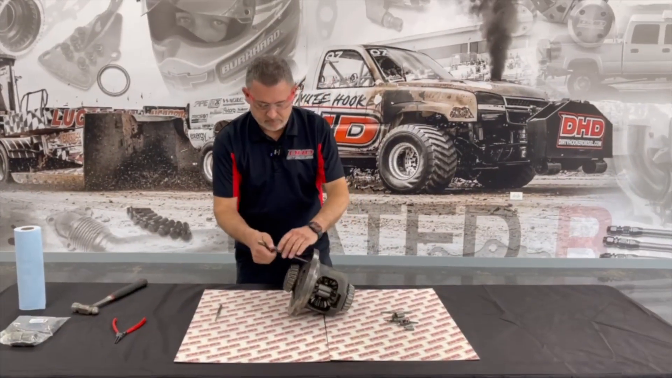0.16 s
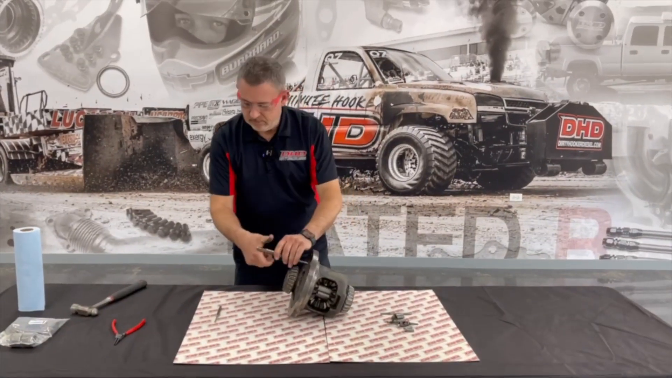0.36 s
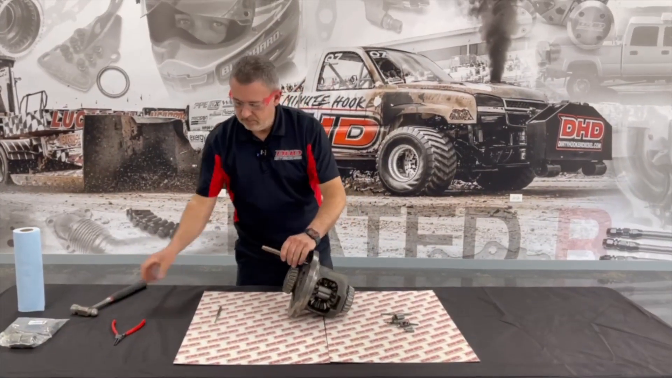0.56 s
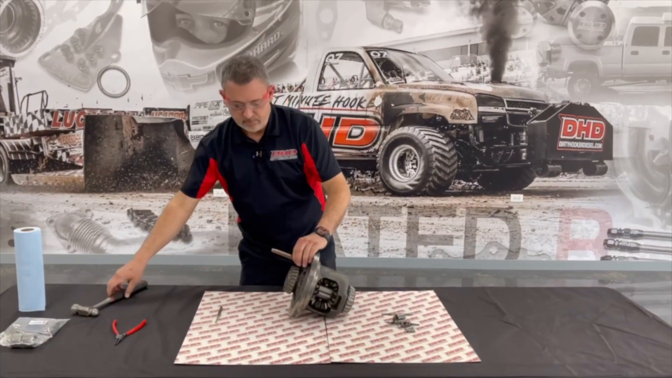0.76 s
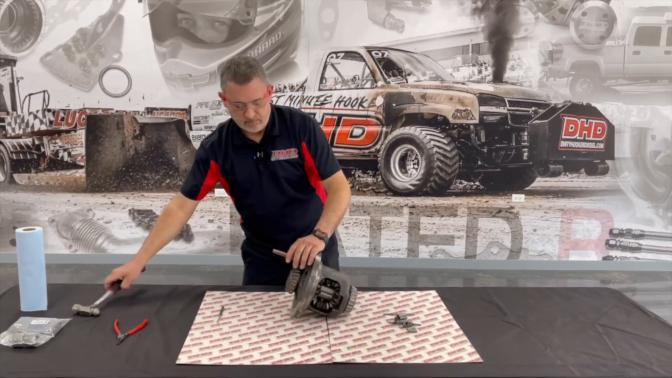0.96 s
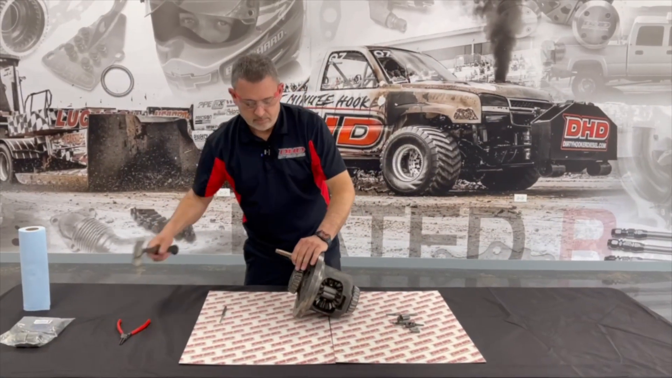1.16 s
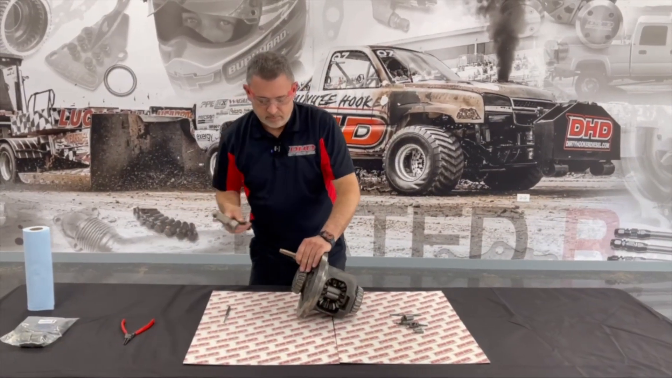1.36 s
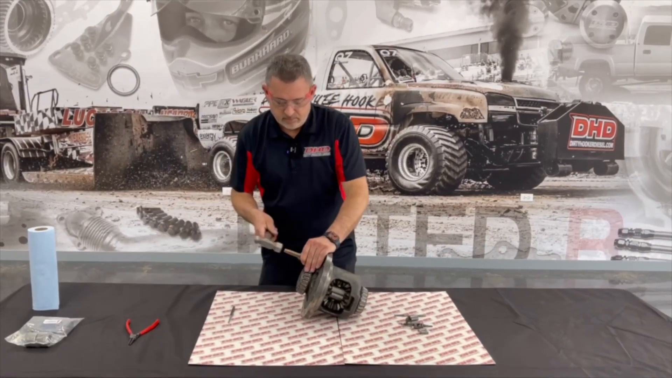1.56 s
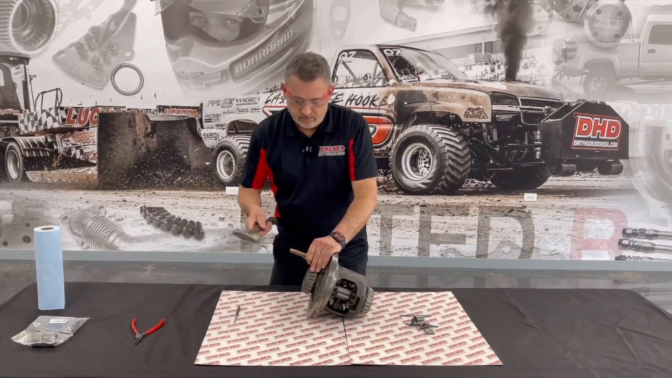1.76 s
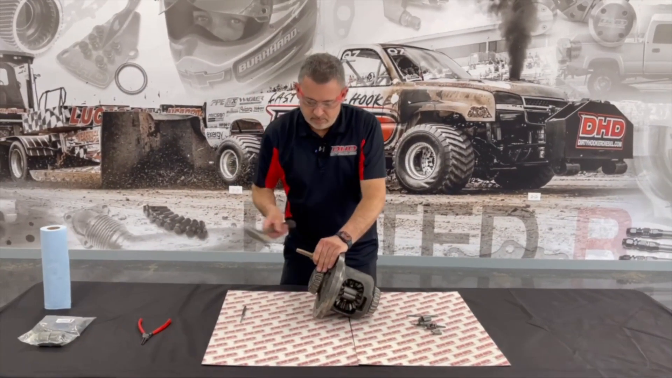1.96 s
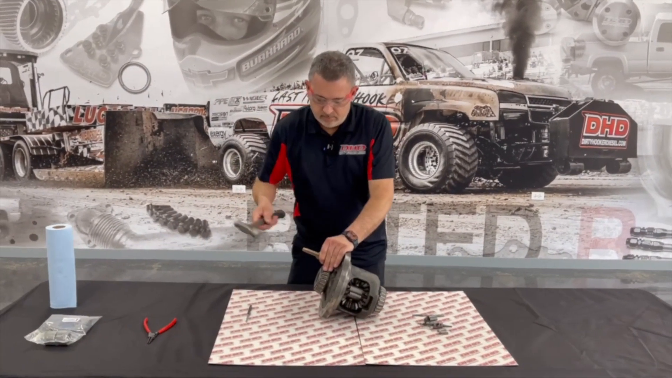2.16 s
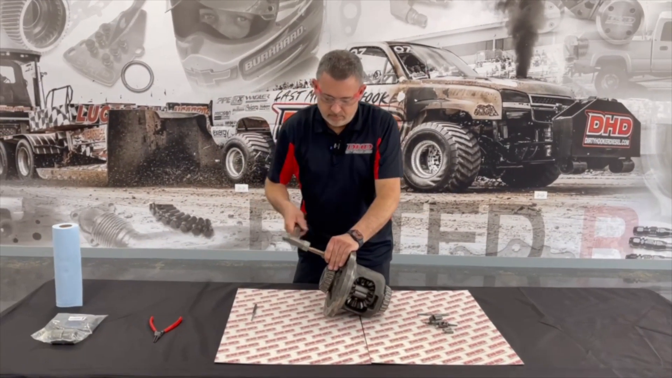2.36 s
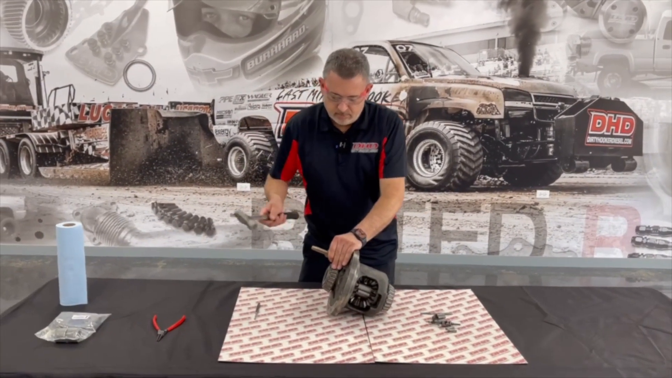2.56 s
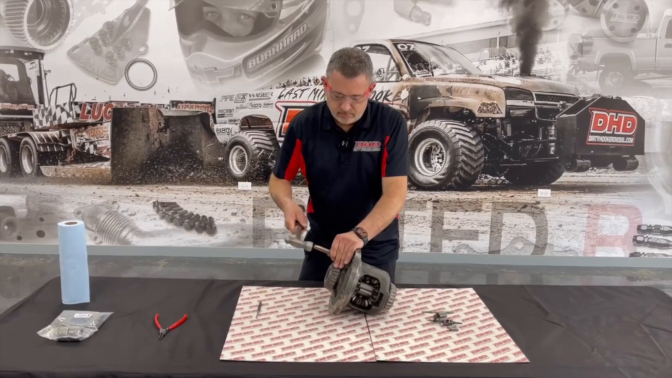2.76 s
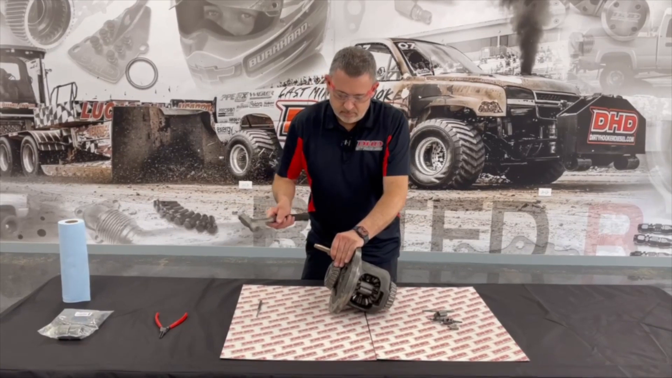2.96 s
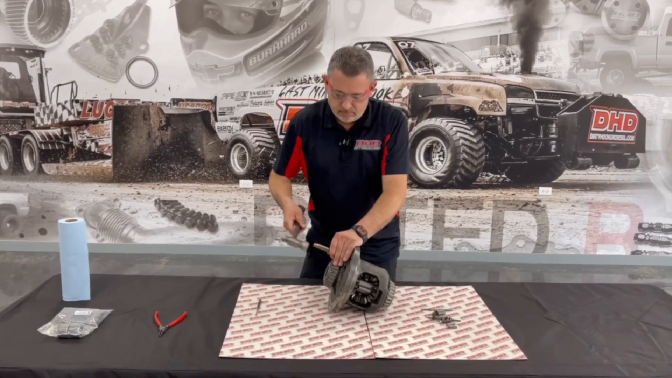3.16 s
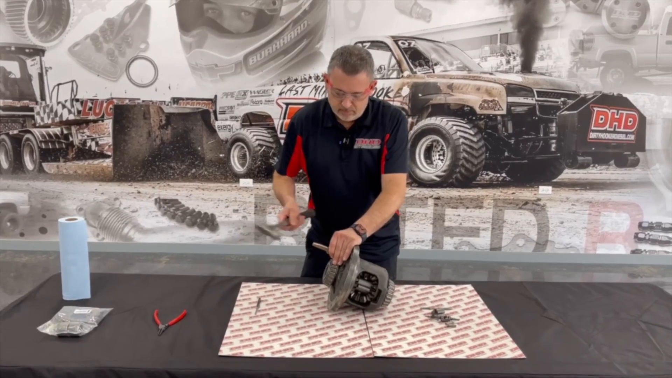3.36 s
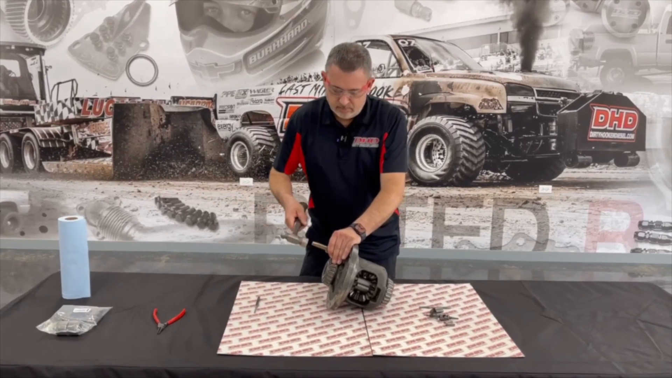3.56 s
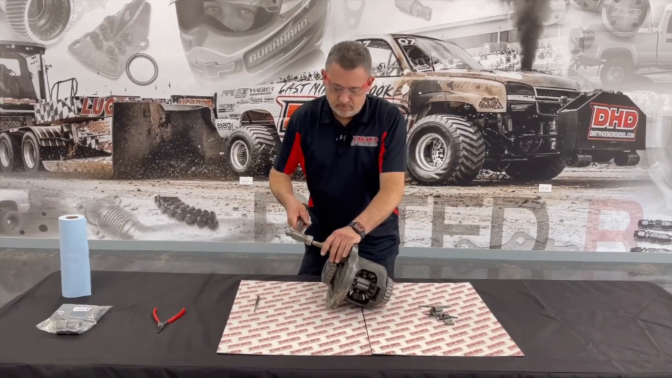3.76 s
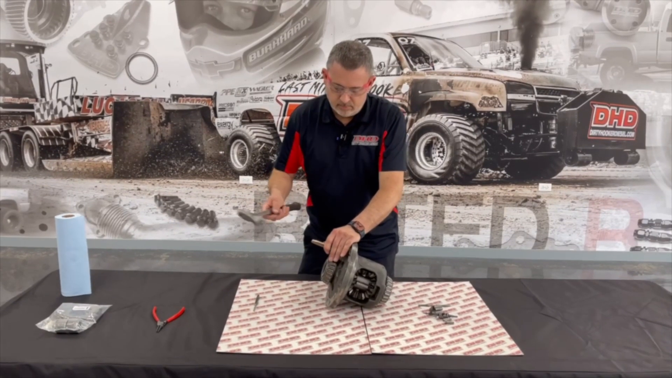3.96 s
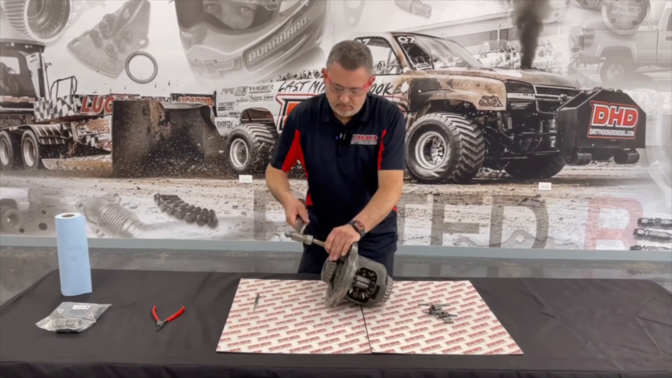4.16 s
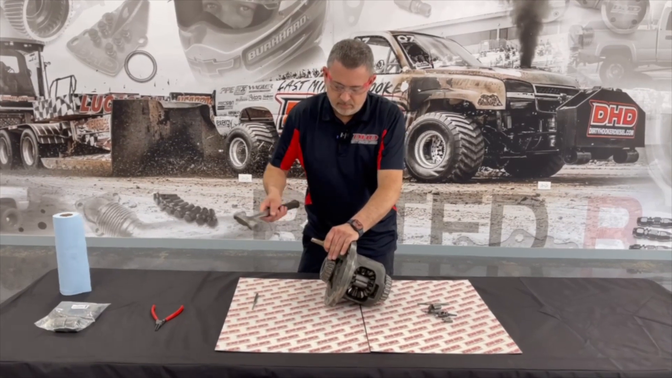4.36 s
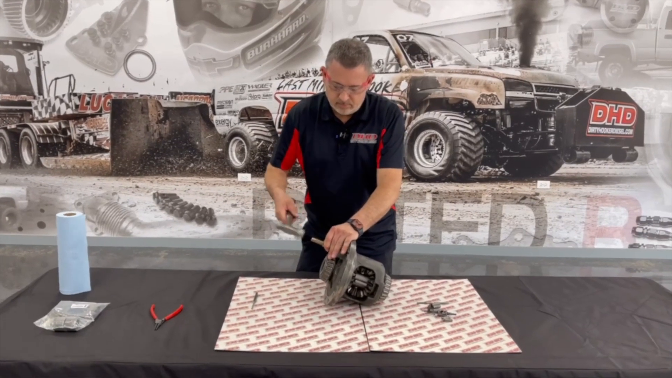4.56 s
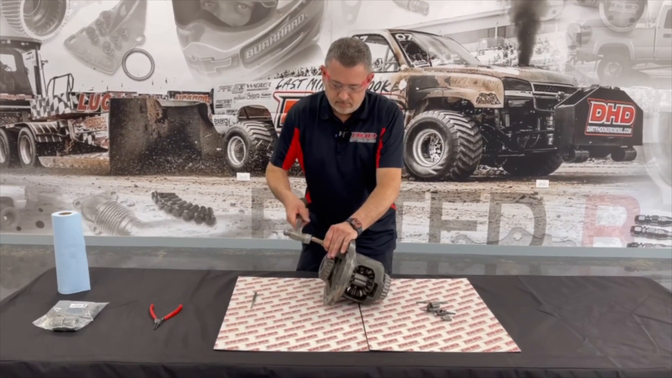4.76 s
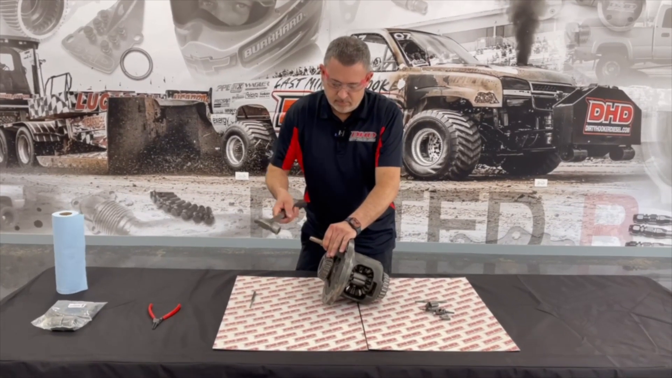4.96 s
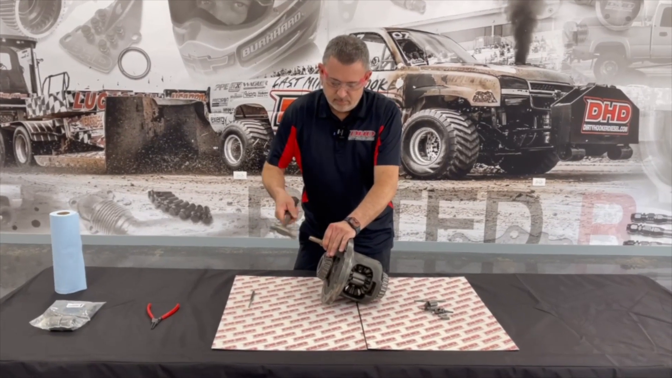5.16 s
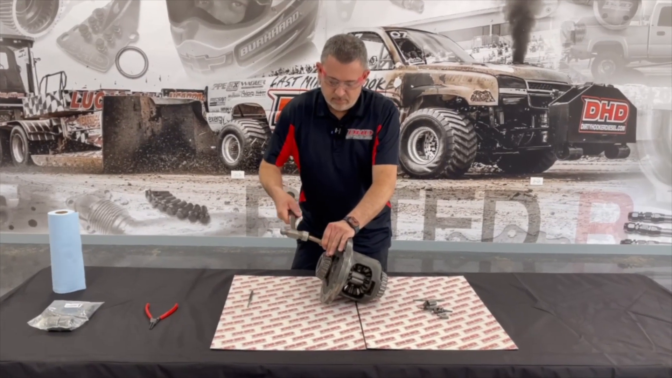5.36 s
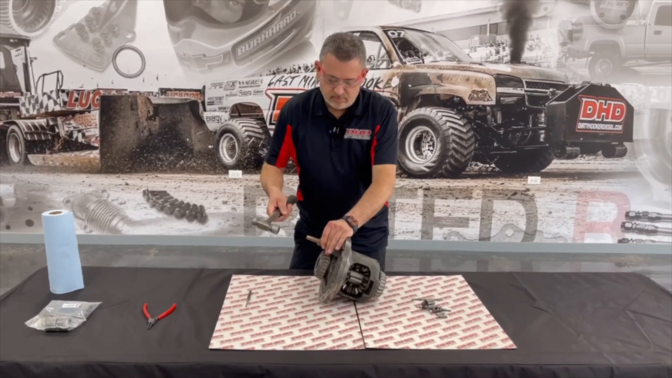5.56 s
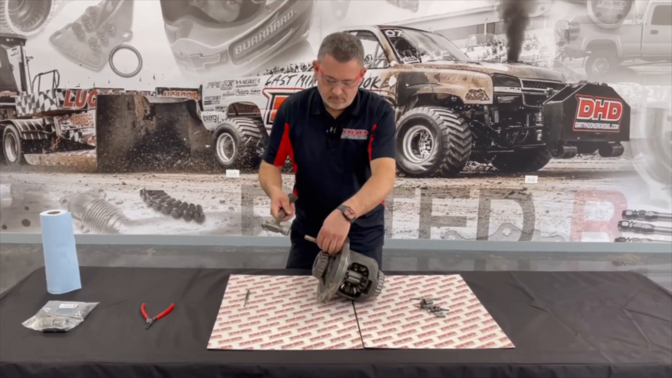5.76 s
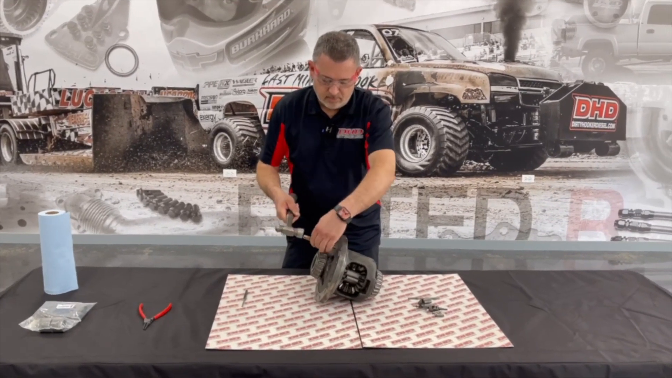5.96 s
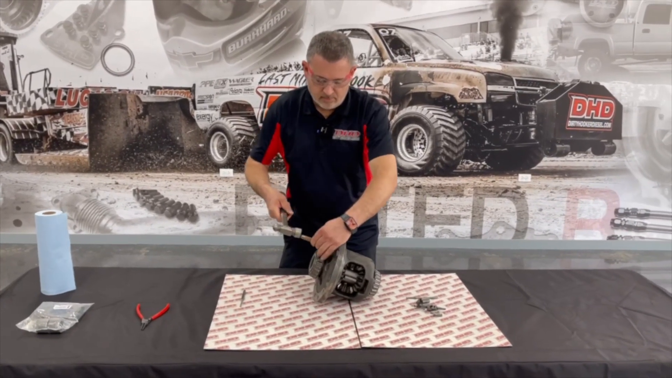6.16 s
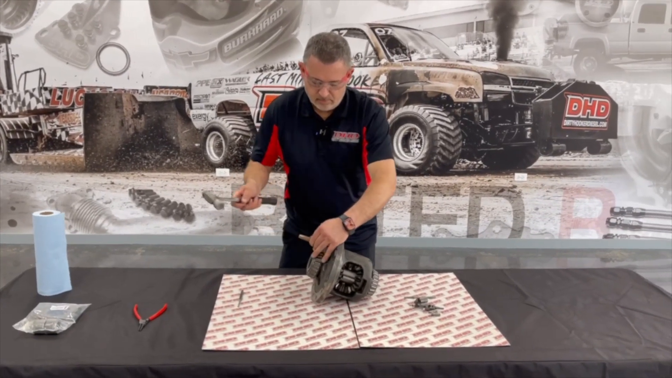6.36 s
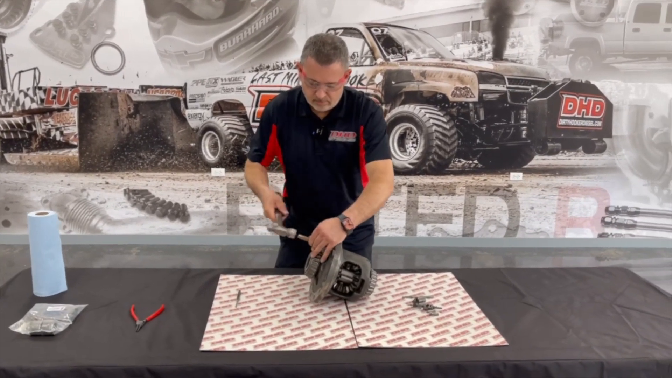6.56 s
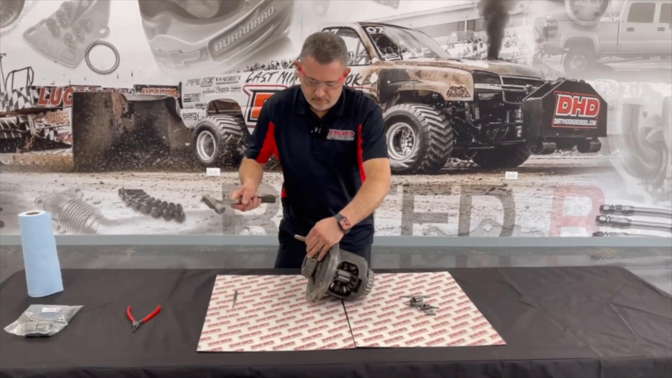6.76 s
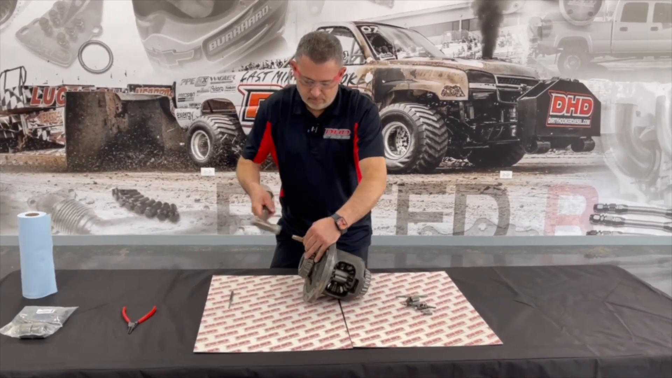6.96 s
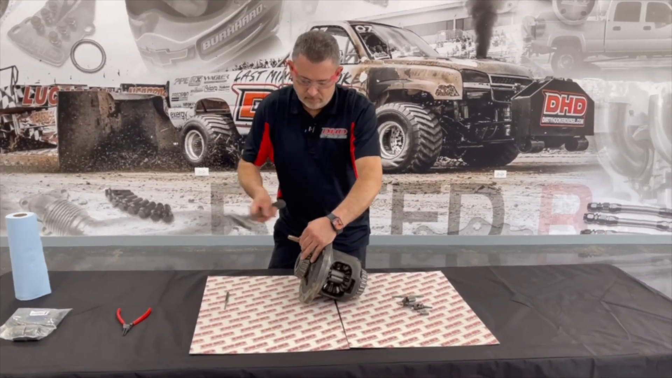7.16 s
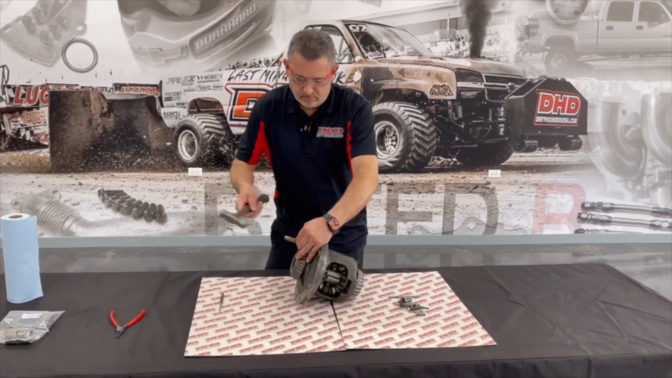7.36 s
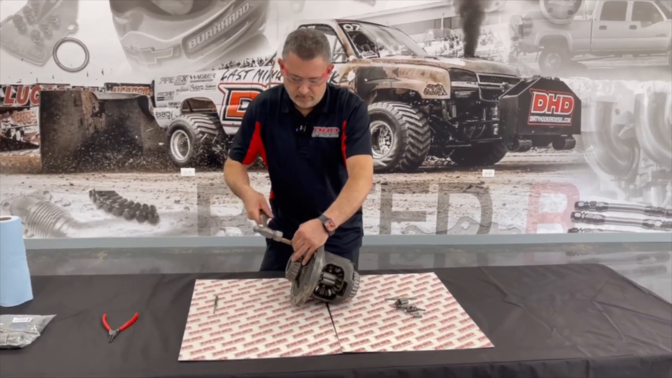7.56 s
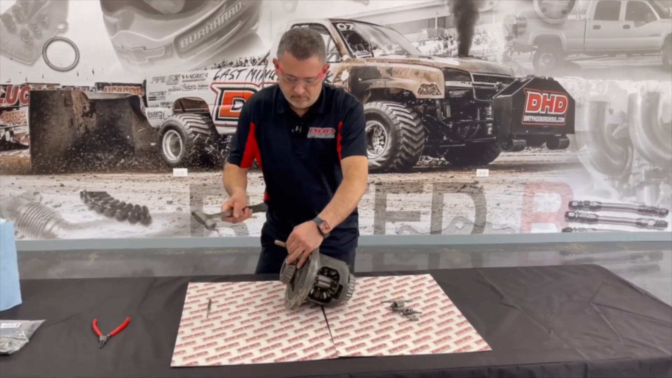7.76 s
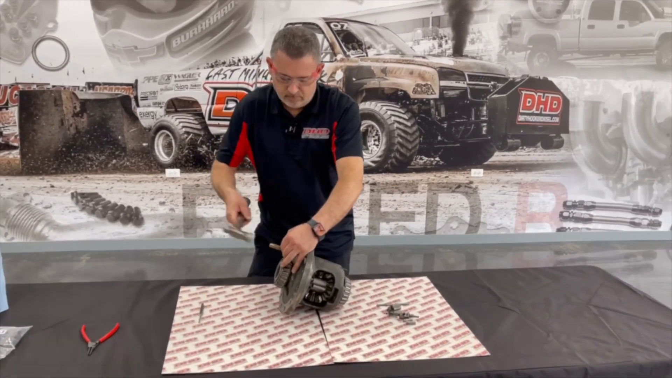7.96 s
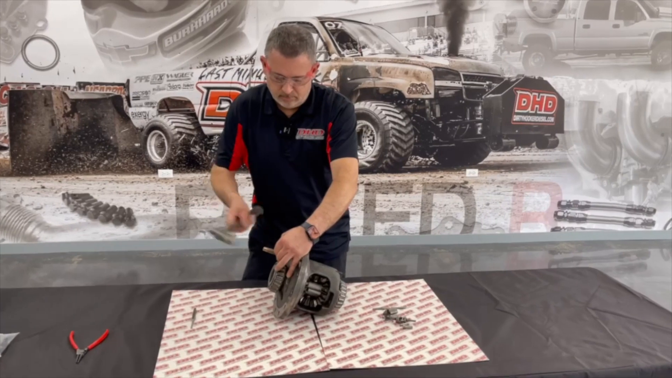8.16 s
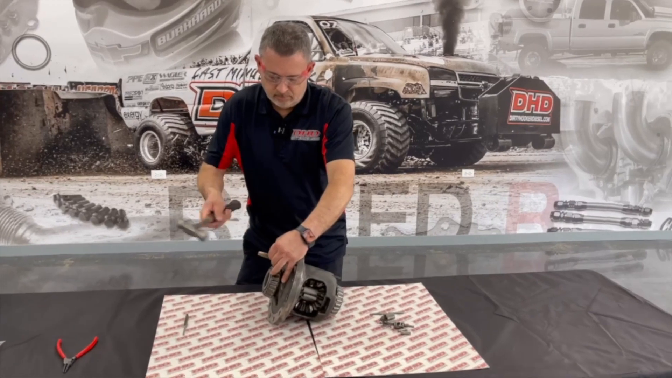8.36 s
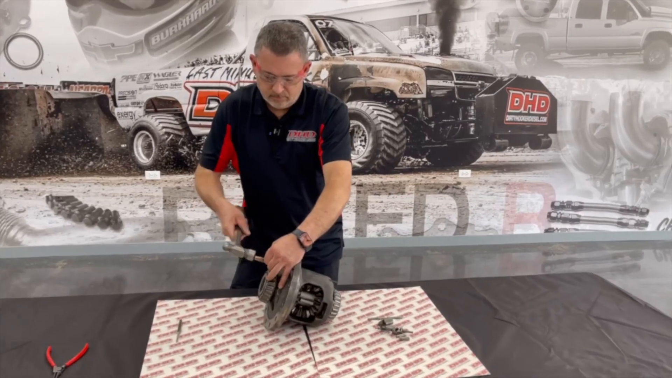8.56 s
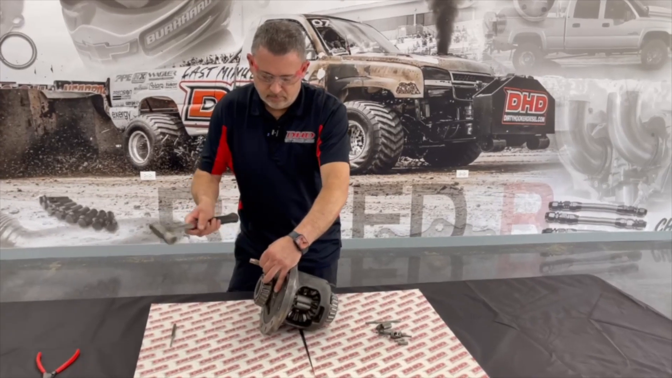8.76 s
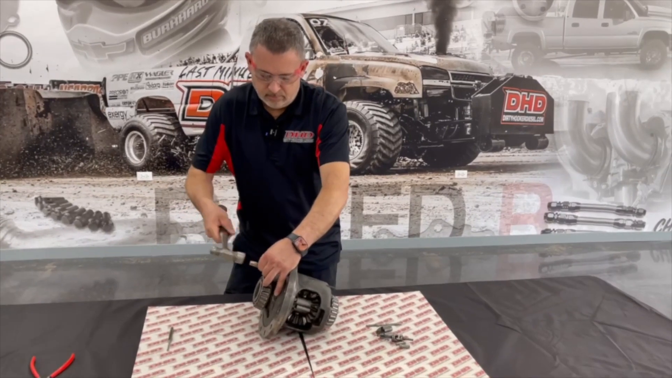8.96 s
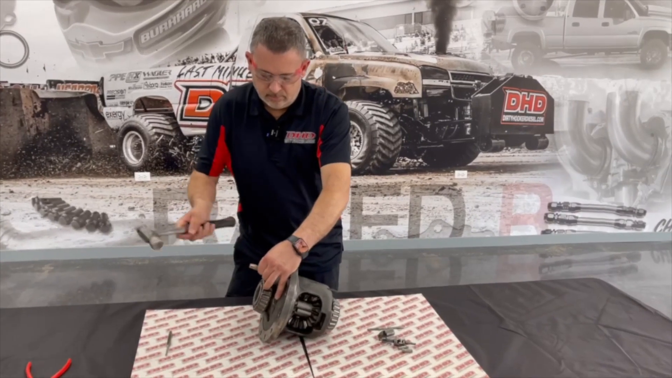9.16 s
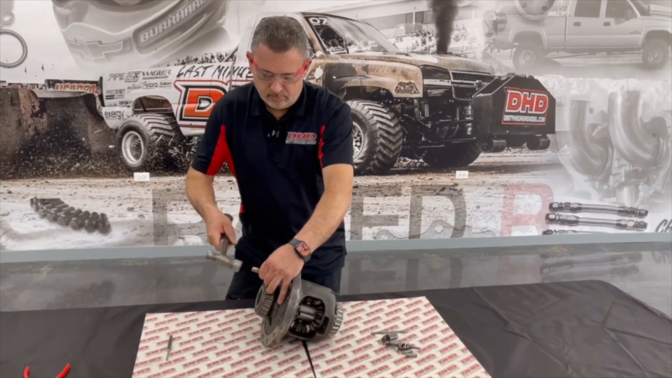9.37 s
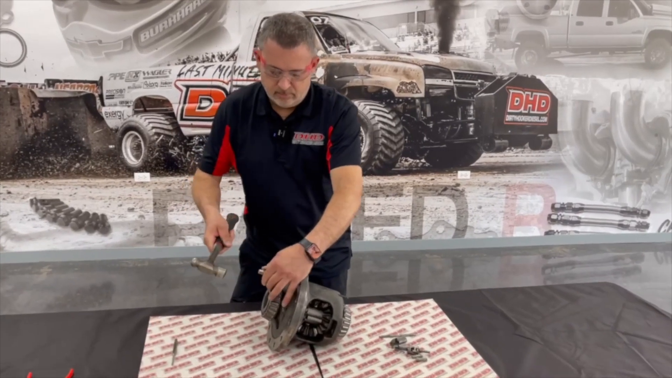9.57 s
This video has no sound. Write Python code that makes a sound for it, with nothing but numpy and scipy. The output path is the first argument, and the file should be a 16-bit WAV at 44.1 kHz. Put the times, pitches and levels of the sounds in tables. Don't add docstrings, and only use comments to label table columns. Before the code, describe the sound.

In a hard-walled workshop, a sleeve rustles faintly and a steel punch scrapes and clicks into its hole. A soft first hammer blow leads to sharp, bright cracks about three a second, each with a clank, short rattle and low bench thump. Two brief pauses hold a light tap or bouncing clicks before the runs resume. The microphone stands a few metres off, catching room echo and very quiet hum.

```python
import sys
import numpy as np
from scipy import signal
from scipy.fft import rfft, irfft
from scipy.io import wavfile
from scipy.ndimage import uniform_filter1d

SR = 44100
rng = np.random.default_rng(int(sys.argv[2]) if len(sys.argv) > 2 else 0)


def amp(db):
    return 10 ** (np.asarray(db, float) / 20)


def write(x):
    x = np.atleast_2d(x).T
    wavfile.write(sys.argv[1], SR, np.round(np.clip(x, -1, 1) * 32767).astype(np.int16))


N = 424706

# [f/Hz, level/dB]
HUM = [(15, -24.5), (25, -8), (127, -1), (309, -11), (439, -14), (796, -11.5), (1400, -25.5), (2350, -18.5),
       (3340, -26), (4370, -21.5), (7920, -28), (12500, -36.5), (16000, -53)]
HUM_DB = -71.5
# [t/s, level/dB]
HUSH = [(0, 1.5), (.15, -5.5), (.4, -1.5), (1.5, -7), (2.1, -3.5), (9.63, -8)]

# [t/s, level/dB]
RUSTLES = [
    (.272, -81),
    (1.029, -75),
    (1.268, -76.5),
    (1.378, -74),
    (1.482, -81.5),
]
# [f/Hz, level/dB]
CLOTH = [(1200, -29.5), (1900, -11.5), (2650, 6), (3300, -2), (5000, -5), (8000, -9), (12000, -25),
         (16000, -35)]
RUSTLE_IN_S, RUSTLE_IN_DB, RUSTLE_OUT_S, RUSTLE_OUT_DB = 0.048, -24.5, 0.039, -27

# [jam t/s, push length/s, level/dB, whistle from f/Hz, to f/Hz]
PUSHES = [
    (0.543, .05, -48, 2600, 3364),
    (0.623, .042, -48.5, 3607, 4200),
    (0.654, .012, -51.5, 3840, 3900),
    (0.703, .03, -34, 2900, 2720),
]
# [f/Hz, level/dB]
RUB = [(350, -72), (600, -38.5), (834, -28), (1880, -49), (3940, -16.5), (5260, -1), (6830, -3.5),
       (10600, -8), (16000, -40.5)]
PUSH_START_DB, PUSH_MIDDLE_DB = -26, -14.5
STOP_S, STOP_DB = .016, -23.5
WHISTLE_DB = (3, -2.5, -6.5)

# [t/s, level/dB, f/Hz, loose punch level/dB, bench level/dB]
TICKS = [(0.697, -38, 5530, -36.5, -61), (0.709, -38, 8600, -68, -56.5), (0.736, -56, 5400, -70, -70),
         (0.868, -44.5, 910, -86, -58), (0.903, -56.5, 5540, -87, -62), (1.027, -55, 940, -87, -47),
         (1.072, -51, 5560, -78.5, -59), (1.244, -55.5, 1110, -95.5, -65.5),
         (3.733, -41.5, 4560, -72.5, -67.5), (6.312, -55, 1930, -85, -74), (6.369, -58, 2700, -95, -66),
         (6.373, -54, 1090, -97.5, -64.5), (9.281, -7.5, 554, -96, -61)]
# [t/s, level/dB, loose punch level/dB, bench level/dB]
TAPS = [
    (3.654, -26.5, -43.5, -48.5),
    (5.996, -23.5, -55.5, -46),
    (6.036, -51, -68, -41.5),
    (6.049, -25.5, -58, -52),
    (6.068, -35, -67, -48),
    (6.083, -39.5, -79.5, -53),
    (6.091, -47.5, -70, -60),
]
# [f/Hz, level/dB, t60/s]
TAP = [(606, -2.5, 0.016), (1780, -32.5, .03), (2900, -7, 0.031), (4200, 13.5, 0.0048), (6900, -0.5, 0.011),
       (10240, -2, 0.0082), (13560, -5.5, 0.016)]
# [f/Hz, level/dB, t60/s]
PUNCH = [(2700, -19.5, .02), (5530, -7, 0.03), (8000, -4, 0.049), (12480, -2, 0.017)]
# [f/Hz, level/dB, t60/s]
AFTER_RING = [(5520, -28, .6), (5590, -30, .55), (5650, -34, .4), (8040, -34, .4), (8110, -36, .3),
              (12500, -39, .25)]
TICK_KNOCK_DB, TAP_BOOM_DB = -2, -3.5

# [t/s, force level/dB, square-hit squeal level/dB, favoured casting mode f/Hz, punch lean -2 to 2]
BLOWS = [(1.614, -16, -37, 5460, 0.16), (2.019, -4.5, -12, 4600, -0.91), (2.393, -4.5, -7.5, 4540, 0.32),
         (2.724, -3.5, -10.5, 4762, 0.2), (3.064, -3.5, -5.5, 4670, 0.79), (3.428, -4.5, -20.5, 4936, 1.2),
         (4.151, -3, -11, 6065, 0.67), (4.495, -4, -16, 7880, 0.46), (4.793, -4.5, -31, 3995, 1.6),
         (5.069, -5.5, -23.5, 5860, 0.79), (5.318, -5.5, -51.5, 5550, -0.093),
         (6.521, -3.5, -10, 4030, -0.51), (6.885, -2.5, -15, 4140, 0.56), (7.220, -2.5, -22.5, 4330, 0.9),
         (7.54, -3.5, -40, 4080, 0.41), (7.868, -4, -13.5, 4460, -0.21), (8.214, -3, -24, 4350, 1.1),
         (8.547, -2.5, -19, 2220, -.1), (8.897, -2.5, -17.5, 3740, 0.58), (9.278, -1, -22, 2183, 0.89)]
UPPER_S = [3.428, 4.151, 6.521, 6.885]
USUAL_DB = -4
# crack, casting, bench, favoured mode, long ring at the usual force [level/dB]
LAYER_DB = (-3.5, -20.5, -28, -13.5, -1.5)
LAYER_SLOPE = (.9, 1.6, 1.6, .8, 1.7)
SQUEAL_HZ, OTHER_MODE_DB = (10380, 11345), -7.5
TILT_DB, TILT_PER_SQUEAL, TILT_PER_FORCE = 0.17, 0.026, 0.55
# [f/Hz, level/dB]
CRACK = [(180, -43), (300, 7), (2680, -11), (3220, -27), (4080, 5.5), (5720, -14), (6330, 0.5), (8860, -7),
         (11200, -4), (15700, -6), (17500, -11.5)]
# [f/Hz, level/dB]
RATTLE = [(180, -11), (300, 1.5), (1080, -11), (2080, -3.5), (3690, -4.5), (4900, -6), (8560, -13),
          (11400, -13), (13000, -18), (15800, -21), (17500, -25)]
# [f/Hz, width/Hz, level/dB]
CASTING = [(1696, 38, -5.5), (2216, 46, -9.5), (2600, 23, -7), (2903, 43, -4), (3832, 160, -9.5),
           (4770, 18, -8), (5900, 49, -13.5), (6350, 70, -17.5), (7240, 53, -2), (8200, 52, -4),
           (10420, 160, -14), (11900, 70, -21.5), (12920, 34, -14), (15420, 80, -20)]
# [f/Hz, level/dB, t60/s]
RING = [
    [(1650, 8, .6), (1683, 11, .7), (1702, 10, .7), (1750, 8, .7)],
    [(2406, 18, .6), (2435, 11, .5)],
    [(5975, 19, .5), (6006, 12, .6)],
    [(7144, 18, .28), (7370, 20, .17)],
]
# [level/dB, dB per unit of lean]
RING_SHARE = [(-54, -3), (-60, -6), (-60, 7), (-59, 4)]
# [f/Hz, level/dB, t60/s]
BENCH = [(205, -12, .15), (256, -12, .15), (283, -6, .28), (308, -10, .15), (333, -11, .15),
         (372, -11, .15), (414, -10, .12), (448, -12, .15), (484, -9, .25), (525, -11, .18),
         (576, -12, .15)]
# [f/Hz, level/dB, t60/s, sign of the side that moves first]
BOOM = [(56, -17, 0.45, 1), (94, -12, 0.59, 0.98), (118.5, 5, 0.033, 0.18), (132.17, -12.5, 1, 0.42),
        (139.4, 3, 0.47, -1.134), (155, -11, 1, 0.76), (164.6, -5, 0.29, 0.98), (169.7, -11.5, 0.75, -0.58)]

# [f/Hz, t60/s]
SHOP_T60 = [(100, 0.31), (300, 0.53), (1000, 0.5), (3000, 0.48), (6000, 0.63), (9000, 0.34), (12000, 0.37),
            (16000, .25)]
# [f/Hz, level/dB]
SHOP_DB = [(100, -1), (300, -0.5), (1000, -3.5), (3000, -12.5), (6000, -8), (9000, -3.5), (12000, -13),
           (16000, -6.5)]
# [f/Hz, t60/s]
FAR_T60 = [(100, 1.4), (1000, 1.3), (4000, 1.1), (8000, 0.79), (16000, 0.44)]
SLAP_S, SLAP_DB = .039, -6


def read(points, hz):
    f, value = np.transpose(points)
    return np.interp(np.log(hz + 1), np.log(f + 1), value)


def add(mix, s, sound):
    part = mix[round(s * SR):][:len(sound)]
    part += sound[:len(part)]


def rise(t, s):
    return 1 - np.exp(-(t / s) ** 2)


def colour(size, spectrum, tilt_db=0., corner_hz=20400.0):
    hz = np.fft.rfftfreq(size, 1 / SR)
    tilted = amp(read(spectrum, hz) + tilt_db * np.log2(1 + hz / 3000))
    return tilted / (1 + (hz / corner_hz) ** 3)


def noise(size, *shape, **more):
    x = irfft(rfft(rng.standard_normal(size)) * colour(size, *shape, **more), size)
    return x / x.std()


def ring(t, modes, spread_db=0., detune=0.):
    hz, db, t60 = np.transpose(modes)
    level_luck, pitch_luck = rng.standard_normal((2, len(modes)))
    turn = 2 * np.pi * hz * (1 + detune * pitch_luck) / SR
    keep = np.exp(-np.log(1000) / t60 / SR)
    kick = amp(db + spread_db * level_luck) * keep * np.sin(turn)
    impulse = 1. * (t == 0)
    out = np.zeros(len(t))
    for g, w, r in zip(kick, turn, keep):
        out += signal.lfilter([0, g], [1, -2 * r * np.cos(w), r * r], impulse)
    return out


def hum(t):
    return amp(HUM_DB + np.interp(t, *np.transpose(HUSH))) * noise(N, HUM)


def rustle(s, db):
    start, end = s - RUSTLE_IN_S, s + RUSTLE_OUT_S
    t = np.arange(start, end, 1 / SR)
    swell = np.interp(t, [start, s, end], [db + RUSTLE_IN_DB, db, db + RUSTLE_OUT_DB])
    return start, noise(len(t), CLOTH) * amp(swell + 3) * signal.windows.tukey(len(t), .05)


def push(s, length, db, from_hz, to_hz):
    return scrape([(s - length, db + PUSH_START_DB, from_hz, WHISTLE_DB[0]),
                   (s - length / 2, db + PUSH_MIDDLE_DB, (from_hz + to_hz) / 2, WHISTLE_DB[1]),
                   (s, db, to_hz, WHISTLE_DB[2]),
                   (s + STOP_S, db + STOP_DB, to_hz, WHISTLE_DB[2])])


def scrape(rows):
    s, *columns = np.transpose(rows)
    t = np.arange(s[0], s[-1], 1 / SR)
    db, hz, whistle_db = (np.interp(t, s, c) for c in columns)
    edge = signal.windows.tukey(len(t), .15)
    grit = amp(1.6 * uniform_filter1d(rng.standard_normal(len(t)), size=60) * np.sqrt(60))
    rub = noise(len(t), RUB) * grit * amp(db - 6.5) * edge
    a, b = signal.lfilter([1], [1, -.99], rng.standard_normal((2, 3, len(t)))) * 0.1
    turns = np.cumsum(hz) / SR * np.array([[1], [1.75], [.23]])
    voices = ((a + 1j * b) * np.exp(2j * np.pi * turns)).real
    whistle = amp(np.array([0, -7, -15])) @ voices
    sung = signal.oaconvolve(rub, ring(np.arange(SR // 4) / SR, PUNCH)) * amp(-59)
    add(sung, 0, rub + whistle * amp(db + whistle_db) * edge)
    return s[0], sung


def clap(*shape, **more):
    x = np.fft.fftshift(irfft(colour(512, *shape, **more)))
    return x / np.linalg.norm(x)


def boom(t, spread_db, low_db=0.):
    return sum(sign * ring(t, [(hz, db + low_db * (hz < 120), t60)], spread_db) for hz, db, t60, sign in BOOM)


def touch(modes, corner_hz, db, free_db, boom_db, knock_db):
    t = np.arange(SR // 2) / SR
    click = .5 * noise(len(t), CRACK, corner_hz=corner_hz) * amp(db - 60 * t / 0.033)
    free = ring(t, PUNCH + AFTER_RING) * amp(free_db + 10)
    steel = (click + free) * rise(t, 0.0003) + 0.39 * amp(db) * ring(t, modes, 0.81)
    top = ring(t, [(f, d, .5 * s) for f, d, s in BENCH], 2.5, .03)
    knock = top * amp(knock_db + 8.0) * rise(t, 0.0041)
    low = boom(t, 2.2, 11.0) * amp(boom_db - 7.0 - 60 * t / 1.2) * rise(t, 0.0056)
    walls = clap(RATTLE, 1.5, corner_hz=corner_hz) * amp(db + 9)
    return walls, steel, knock, low


def tick(db, hz, free_db, bench_db):
    return touch([(hz, 0, .015)], 1.8 * hz, db, free_db, bench_db, bench_db + TICK_KNOCK_DB)


def tap(db, free_db, bench_db):
    return touch(TAP, 12000.0, db, free_db, bench_db + TAP_BOOM_DB, bench_db)


def strike(s, force_db, squeal_db, mode_hz, lean):
    extra_db = force_db - USUAL_DB
    crack, casting, bench, mode, long = (db + slope * extra_db for db, slope in zip(LAYER_DB, LAYER_SLOPE))
    tilt = TILT_DB + TILT_PER_SQUEAL * (squeal_db - crack + 19) + TILT_PER_FORCE * extra_db
    upper = np.isclose(s, UPPER_S, atol=1 / 20).any()
    punch_hz = SQUEAL_HZ[::-1] if upper else SQUEAL_HZ
    ring_db = [long + db + slope * lean for db, slope in RING_SHARE]
    return blow(crack, punch_hz, squeal_db, casting, bench, mode, mode_hz, force_db - crack, tilt, ring_db)


def blow(crack_db, punch_hz, punch_db, casting_db, bench_db, mode_db, mode_hz, rattle_db, tilt_db, ring_db):
    t = np.arange(SR * 2 // 3) / SR
    early = t[:SR // 8]
    crack = noise(len(t), CRACK, tilt_db) * amp(crack_db - 4 - 60 * t / 0.012) * rise(t, 0.00078)
    contact = rise(early, 0.0012) * np.exp(-(early / 0.0016) ** 2)
    squeal = ring(early, [(punch_hz[0], punch_db + 13, .05),
                          (punch_hz[1], punch_db + 12.5 + OTHER_MODE_DB, .05)]) * contact
    short = [(f * pair, db, 1.8 / w) for f, w, db in CASTING for pair in (.99, 1.01)]
    clank = ring(early, short, 4., .006) * amp(casting_db - 1.5)
    favoured = ring(early, [(mode_hz * near, mode_db - 5, .022) for near in (.96, 1, 1.045)], 3.3)
    rattle = noise(len(t), RATTLE, tilt_db) * amp(crack_db + rattle_db - 17 - 60 * t / 0.15)
    rattle /= 1 + (t / 0.029) ** 3
    rattle *= amp(4.5 * np.tanh(uniform_filter1d(rng.standard_normal(len(t)), size=64) * 8))
    long = [(hz, db + group_db, t60) for modes, group_db in zip(RING, ring_db) for hz, db, t60 in modes]
    steel = rattle + ring(t, long, 1.5, .001) * amp(-3)
    add(steel, 0, squeal + clank + favoured)
    knock = ring(t, BENCH, 2., .008) * amp(bench_db + 1) * rise(t, 0.012)
    low = boom(t, 0.54) * amp(bench_db - 1.0) * rise(t, 0.0049)
    walls = amp(-26.5) * squeal + amp(-19) * favoured + amp(-21) * clank
    add(walls, 0, clap(RATTLE, tilt_db) * amp(crack_db + rattle_db + 6.5))
    return walls, crack + steel * rise(t, 0.00051), knock, low


def tail(t60, onset, size):
    hz, t, z = signal.stft(rng.standard_normal(size), SR, nperseg=256)
    decay_db = read(SHOP_DB, hz)[:, None] - 60 * t / read(t60, hz)[:, None]
    x = signal.istft(z * amp(decay_db), SR, nperseg=256)[1]
    return x * rise(np.arange(len(x)) / SR, onset) ** 2 / np.sqrt(SR / 20)


def shop_echo(send, t):
    wet = np.zeros(N)
    for share in (np.cos(2.356 * t), np.sin(2.335 * t)):
        shop = tail(SHOP_T60, 0.018, size=SR)[:SR] + amp(-9.0) * tail(FAR_T60, 0.088, size=SR)[:SR]
        add(shop, SLAP_S, amp(SLAP_DB) * tail(SHOP_T60, .002, size=SR))
        wet += signal.oaconvolve(send * share, shop)[:N]
    return wet


def scene():
    hits = [(s, strike(s, *row)) for s, *row in BLOWS]
    hits += [(s, tick(*row)) for s, *row in TICKS]
    hits += [(s, tap(*row)) for s, *row in TAPS]
    walls, steel, bench, low = mixes = np.zeros((4, N))
    for s, parts in hits:
        for mix, part in zip(mixes, parts):
            add(mix, s - .0003, part)
    for s, sound in [push(*row) for row in PUSHES] + [rustle(*row) for row in RUSTLES]:
        add(steel, s, sound)
        add(walls, s, 0.42 * sound)
    send = walls + amp(-17) * steel + amp(-8) * bench + amp(-18) * low
    t = np.arange(N) / SR
    return (steel + bench + low + amp(2.5) * shop_echo(send, t) + hum(t))[None]


def band_limit(x):
    return signal.sosfilt(signal.butter(12, 17130, fs=SR, output="sos"), x)


def record(dry):
    ceiling = .6
    x = signal.lfilter(*signal.butter(4, 45., "high", fs=SR), dry)
    x = ceiling * np.tanh(x / ceiling)
    band = signal.firwin(301, 15950, window=("kaiser", 5), fs=SR)[None]
    x = amp(-25) * x + signal.oaconvolve(x, band, "same")
    return band_limit(x)


dry = scene()
out = record(dry)
write(out)
```